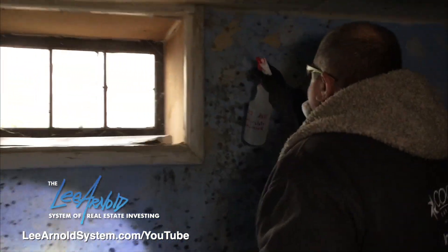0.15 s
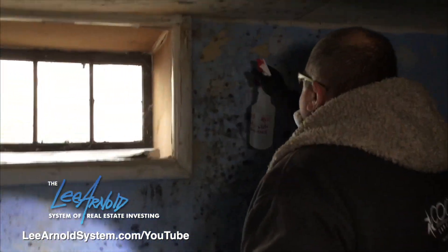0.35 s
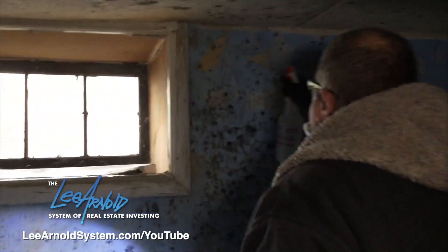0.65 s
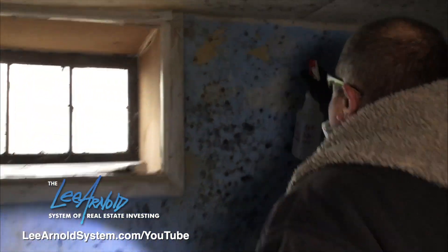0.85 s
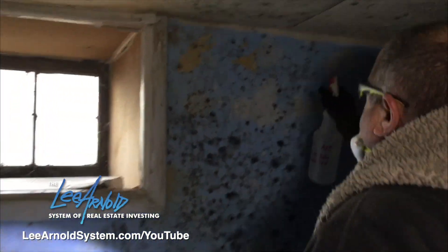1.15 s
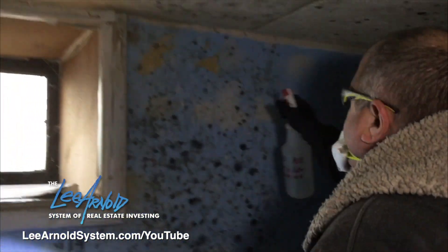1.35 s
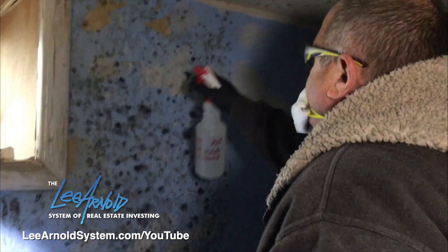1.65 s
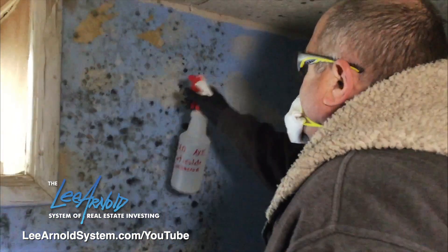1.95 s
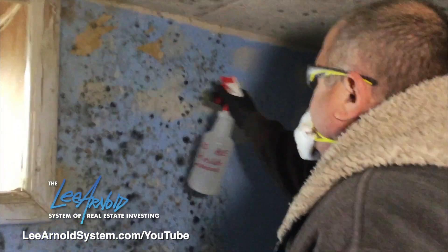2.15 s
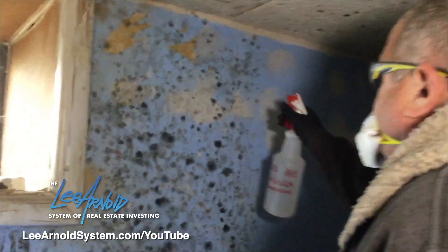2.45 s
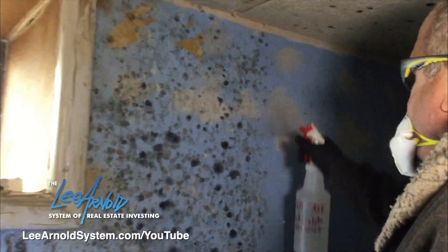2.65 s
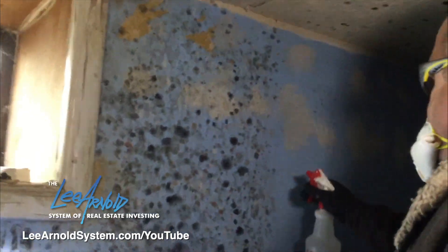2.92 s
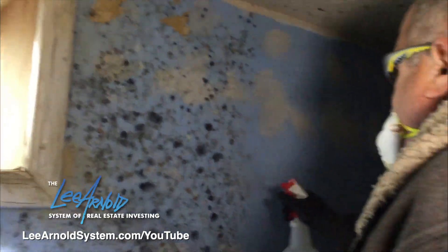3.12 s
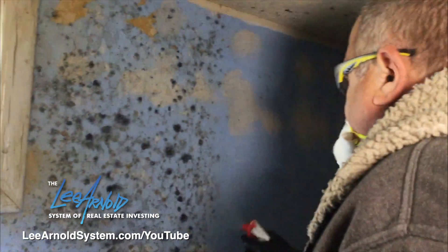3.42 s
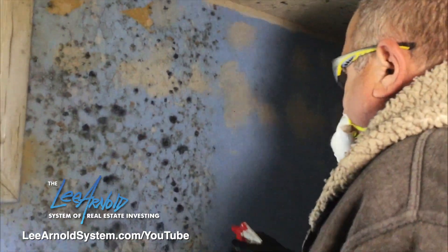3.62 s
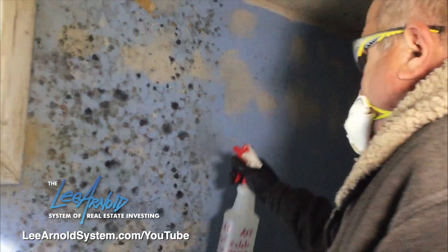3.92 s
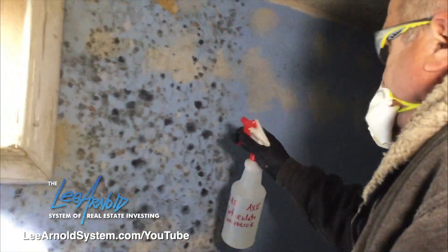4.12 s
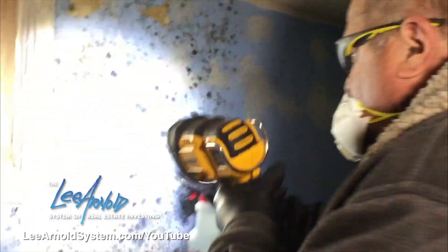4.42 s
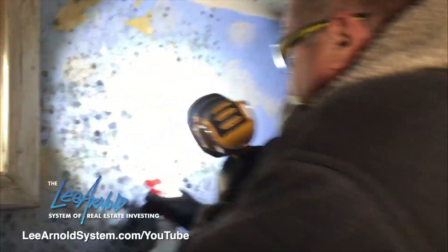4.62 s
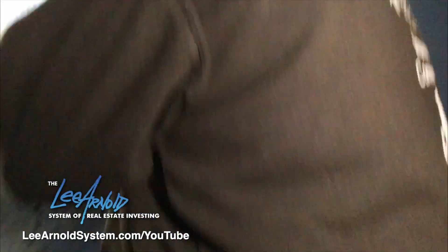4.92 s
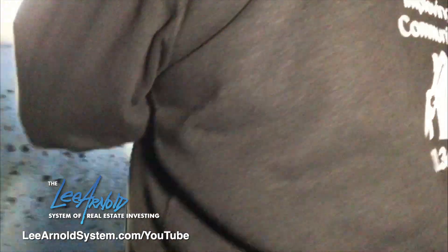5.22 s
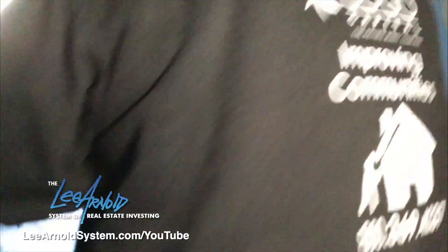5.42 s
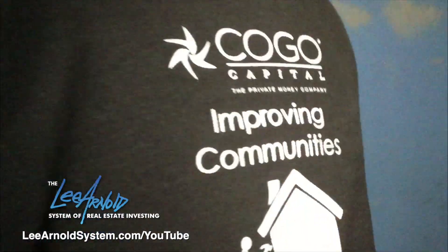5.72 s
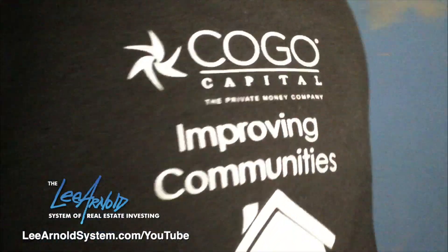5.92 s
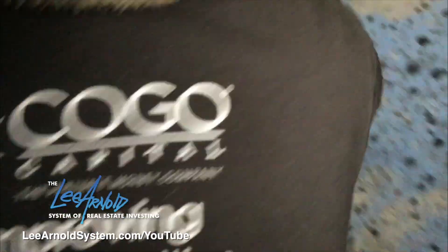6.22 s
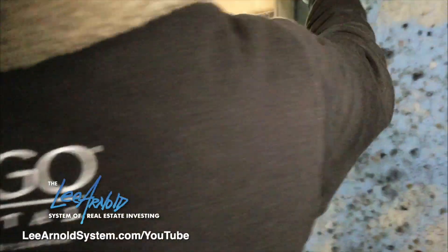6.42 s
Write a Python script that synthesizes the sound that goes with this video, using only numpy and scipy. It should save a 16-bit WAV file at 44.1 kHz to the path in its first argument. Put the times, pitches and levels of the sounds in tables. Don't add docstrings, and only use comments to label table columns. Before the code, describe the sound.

A trigger spray bottle pumps sixteen short, bright hisses in a steady rhythm, with handling knocks, jacket rustle and low rumble close by.

```python
import sys
import numpy as np
from scipy import signal
from scipy.fft import rfft, irfft
from scipy.io import wavfile
from scipy.ndimage import uniform_filter1d

SR = 44100
rng = np.random.default_rng(int(sys.argv[2]) if len(sys.argv) > 2 else 0)


def wrap_up_sound(samples):
    columns = np.atleast_2d(samples).T
    tamed = np.clip(columns, -1, 1)
    steps = np.round(tamed * 32767).astype(np.int16)
    wavfile.write(sys.argv[1], SR, steps)


def invert_db(level):
    return 10 ** (np.asarray(level, dtype=float) / 20)


N = 289296

# (time [s], movement [dB], drag [dB])
HANDLING = [(0, 5, 14.5), (.13, -1.5, 5), (.3, 2.5, 14), (.47, -5.5, -15.5), (.78, 4.5, -13.5),
            (1, 8.5, 10.5), (1.4, -1, -10), (1.8, 0.5, 2.5), (2.2, -5, -7), (2.5, 1, 3.5), (3.051, -0.5, 2),
            (3.3, -1, -9.5), (3.85, -1.5, -4.5), (4.05, -1, 2.5), (4.85, 1.5, 8.5), (5.5, 0.5, 8.5),
            (5.8, -13, -12.5), (6.1, -2.5, -1.5)]
# (frequency [Hz], density [dB per Hz])
RUMBLE_COLOUR = [(15, -45.5), (30, -26.5), (60, -11), (100, -1.5), (160, -4), (260, -6.5), (400, -10.5),
                 (650, -29), (1200, -34), (2500, -52), (5000, -80)]
# (time [s], level [dB])
MOTOR_LEVEL = [(0, -94), (.9, -76.5), (1.2, -69), (1.9, -78), (2.5, -70), (2.8, -86.5), (6.6, -88.5)]
# (middle [s], peak [dB], pitch [Hz], length [s])
BODY_KNOCKS = [(0.42, -41, 756, 0.00134), (0.427, -31.5, 725, 0.00141), (0.4261, -43, 451.6, 0.001105),
               (.4275, -43, 1069, 0.00165), (0.41, -56, 694, 0.0022), (0.439, -56, 705, 0.0021),
               (0.453, -59, 605.5, 0.006), (0.47, -64, 736, 0.0042), (.497, -55, 137, .006),
               (.52, -58, 113.4, 0.006), (1.672, -67, 200, 0.00245), (1.683, -63.5, 524, 0.00335),
               (1.709, -62, 545, 0.0045), (1.726, -64.5, 554, .004), (4.721, -60, 120, 0.0061),
               (4.791, -62.5, 99.6, 0.0065), (4.89, -57.5, 132, 0.005), (5.55, -46, 500, 0.0018),
               (5.557, -28.5, 615.3, 0.001574), (5.56, -39.5, 218.7, 0.00223), (5.563, -55, 111, 0.0083),
               (5.567, -42, 450, 0.00078), (5.938, -48, 638, 0.0019), (5.984, -49, 343, 0.00458),
               (5.994, -40.5, 203, 0.004), (6.003, -51, 111.4, 0.0077), (6.07, -55, 219, 0.00276),
               (6.116, -56.5, 272, 0.0029), (6.341, -57, 605, 0.003), (6.456, -51.5, 396, 0.00058)]
# (time [s], peak [dB], centre [Hz], width [Hz], decay [s])
CASING_SNAPS = [(0.418, -44.5, 9000, 14000, 0.0049), (0.4229, -36, 11000, 16000, 0.00158),
                (0.426, -40.5, 2450, 1500, 0.0026), (.453, -48.5, 13350, 1800, .007),
                (.457, -61, 7500, 2500, .005), (.502, -53.5, 3700, 2000, 0.0015),
                (.511, -59, 3800, 2000, 0.00107), (0.5228, -51, 3100, 3000, 0.00129),
                (.541, -53, 3400, 1800, .001), (4.065, -59.5, 13000, 5000, .012),
                (6.546, -61.5, 4800, 1500, .003), (6.546, -64, 15000, 2000, .003)]
# (start [s], loudest at [s], end [s], level [dB])
SLEEVE_SLIDES = [(0, .09, .14, -54), (.02, .08, .13, -56.5), (.85, .89, 1.08, -60.5),
                 (1.65, 1.76, 1.8, -74), (4.55, 4.6, 4.68, -65), (4.78, 4.86, 5.06, -67),
                 (6.05, 6.08, 6.2, -68), (5.99, 6.003, 6.13, -54), (2.4, 2.48, 2.68, -82),
                 (2.76, 2.88, 3.06, -82), (.7, .9, 1.05, -63), (5.58, 5.7, 5.725, -64)]
# (first pitch [Hz], last pitch [Hz], width [Hz])
SLEEVE_HOLLOWS = [(595, 620, 130), (13600, 13450, 3000), (1850, 4300, 950), (600, 1600, 900),
                  (950, 1600, 1000), (1550, 1100, 1300), (1000, 950, 900), (220, 245, 180),
                  (1800, 1810, 1100), (1800, 1810, 1100), (8500, 8510, 1200), (1300, 1100, 2000)]
# (start [s], length [s], stillest level [dB], rise next to a pull [dB], dull part [dB])
CLOTH_MOVES = [(0, 0.1135, -63.5, 2.5, -6), (0.113, 0.076, -70.5, 1, -8.5), (0.373, 0.048, -70.5, 10.5, -5),
               (0.423, 0.046, -67.5, 5.5, -3), (0.468, 0.11, -67.5, -4, -6.5),
               (0.736, 0.293, -56, -3, -10.5), (1.203, 0.137, -89, 11, -6),
               (1.583, 0.192, -100, 23.5, -5.5), (2.04, 0.193, -100, 21, -2.5),
               (2.477, 0.132, -96.5, 26, -7.5), (2.858, 0.13, -101, 21.5, -5),
               (3.258, .12, -100, 16.5, -8.5), (3.645, 0.16, -100, 18, -7.5), (4.077, 0.128, -87, 16, -8),
               (4.478, 0.083, -80.5, 10, -11), (4.854, 0.193, -68, 7.5, -7), (5.273, 0.1608, -76.5, 9, -3),
               (5.69, .165, -78.5, 4.5, -10.5), (6.1, 0.1394, -80, 6.5, -6),
               (6.501, 0.062, -76.5, -2.5, 2.5)]
# (frequency [Hz], density [dB per Hz])
CLOTH_COLOUR = [(530, -34.5), (900, -7.5), (1830, -6.5), (2090, -12), (3680, -15), (6640, -11.5),
                (8250, -7.5), (10000, -9.5), (13500, -6), (16000, -16)]
# (time [s], peak [dB])
VALVE_TICKS = [(1.2426, -67), (1.3096, -63.5), (1.5584, -54), (1.7206, -63.5), (2.1802, -64),
               (2.4784, -60.5), (2.585, -60.5), (2.9517, -62.5), (3.3523, -64.5), (3.7608, -67),
               (4.1781, -59), (4.56, -63), (4.5896, -50.5), (5.8052, -60), (6.2088, -61), (6.548, -66.5)]
# (jet forms [s], squeeze length [s], jet level [dB], swell during the squeeze [dB],
# splash on the wall re jet [dB])
TRIGGER_PULLS = [(0.196, 0.1002, -42, 1.5, -1.5), (.578, 0.1136, -42, 0.5, -5.5),
                 (0.988, 0.0954, -43.5, 2.5, 1.5), (1.363, 0.10555, -42.5, 2.5, -1),
                 (1.783, 0.1297, -41.5, 1.5, -0.5), (2.248, 0.1085, -41.5, 1.5, 0),
                 (2.642, 0.0862, -40.5, 1.5, -1.5), (3.006, 0.1202, -41, 0.5, -1),
                 (3.409, 0.10976, -41, 2, -1.5), (3.84, 0.1204, -41, 1, 0), (4.241, 0.1255, -39.5, -0.5, 0),
                 (4.644, 0.1305, -40.5, 1.5, 0), (5.056, 0.1356, -42, 2, -2), (5.459, 0.1376, -41, -1, -3),
                 (5.867, 0.1391, -42, -0.5, 1.5), (6.268, 0.1066, -41, 3.5, -1.5)]
# (aim at the microphone, heard in the finest hiss [dB],
# slowness of the pressure build [1 = usual])
HAND_AIM = [(-0.21, 0.78), (.2, 1.3), (-0.28, 0.96), (1, 1.05), (0.73, 1.15), (-1.5, .95), (-.3, .95),
            (0.46, .85), (-.2, .95), (1.78, 1.3), (0.78, 1.05), (1.16, 1.05), (-0.099, 1.05), (0.93, .9),
            (-1.25, 1.2), (-2.1, 1.05)]
# (resonance [Hz], its level [dB], lower shoulder [dB])
SWIRL_CHAMBER = [(4730, 3, -2.5), (4450, 2, 3), (4340, 4, -1.7), (4550, 4.5, -1.84), (4840, 1.5, -0.3),
                 (4800, 4, -2.5), (4670, 1.5, -0.12), (4630, 2, -1.48), (4450, 1, 0.5), (4790, 4.5, -0.5),
                 (4800, 2.5, -3), (5160, 1.5, -1.47), (4820, 0.5, 1.5), (4670, 2, 1.66), (4310, 0, -4.5),
                 (4580, 1.5, -6)]
# (frequency [Hz], density [dB per Hz])
JET_COLOUR = [(180, -55), (300, -25.5), (667, -17), (915, -17), (1430, -8.5), (1780, -9.5), (3580, -3.5),
              (4670, -1.5), (7440, -4.5), (8500, -2.5), (10200, -5.5), (15000, -5.5), (16000, -17.5)]
# (frequency [Hz], width [Hz], level [dB])
NOZZLE_PEAKS = [(8700, 300, 2), (6110, 220, -3), (1800, 540, 1), (11300, 170, 1.5)]
# (time from the jet forming [s], level re jet [dB], fineness of the mist [dB])
PRESSURE_BUILD = [
    (-.036, -48, 10),
    (0, -7, -8),
    (0.023, -1.5, -6.5),
    (.05, 1.5, -2),
]
# (time from letting go [s], level re jet [dB], fineness of the mist [dB])
PRESSURE_SAG = [
    (0, 0, -2.5),
    (0.029, -6.5, -6),
    (0.064, -19.5, -4.5),
    (.1, -31.5, -7),
    (.15, -61, 8.5),
]


def evened(x):
    return x / np.sqrt(np.mean(x ** 2) + 1e-20)


def read(points, hz):
    f, value = np.transpose(points)
    return np.interp(np.log(hz + 1), np.log(f + 1), value)


def add(mix, s, sound):
    part = mix[max(round(s * SR), 0):][:len(sound)]
    part += sound[:len(part)]


def resonate(x, hz, width):
    return signal.lfilter(*signal.iirpeak(hz, hz / width, SR), x)


def in_cellar(x):
    at = np.arange(90, 9000, 22) + rng.integers(0, 22, 405)
    echoes = np.zeros(9100)
    echoes[at] = rng.choice([-1., 1.], len(at)) * invert_db(-60 * at / SR / 0.078)
    echoes *= invert_db(-8.5) / np.linalg.norm(echoes)
    return signal.oaconvolve(x, echoes + signal.unit_impulse(len(echoes)))


def hiss(rows, colour_db, dull_hz, fine_hz, patchy_db, flicker_db):
    s, level_db, *ends_db = np.transpose(rows)
    length = int((s[-1] - s[0]) * SR)
    frames, hz = length // 64 + 5, np.fft.rfftfreq(256, 1 / SR)
    t = s[0] + np.arange(frames) * 64 / SR
    a, b, patches = rng.standard_normal((frames, 129, 3)).T
    patches = uniform_filter1d(patches, size=2, axis=0)
    patches = evened(uniform_filter1d(patches, size=40, axis=1))
    flicker = evened(uniform_filter1d(rng.standard_normal(frames), size=3))
    field_db = colour_db(hz)[:, None] + patchy_db * patches + flicker_db * flicker
    base = np.sqrt(np.mean(invert_db(2 * colour_db(hz))))
    dull_share = 1 / (1 + (hz / dull_hz) ** 6)
    fine_share = 1 / (1 + (fine_hz / (hz + 1)) ** 6)
    for share, end_db in zip((dull_share, fine_share), ends_db):
        field_db = field_db + np.outer(share, np.interp(t, s, end_db))
    spectrum = (a + 1j * b) * invert_db(field_db) / base
    x = signal.istft(spectrum, nperseg=256, noverlap=192)[1][:length]
    curve_db = np.interp(s[0] + np.arange(len(x)) / SR, s, level_db)
    envelope = invert_db(uniform_filter1d(curve_db, size=300))
    return s[0], x / 14 * envelope * signal.windows.tukey(len(x), .1)


def rumble():
    t, noise = np.arange(N) / SR, rng.standard_normal((4, N))
    low_gain = invert_db(read(RUMBLE_COLOUR, np.fft.rfftfreq(N, 1 / SR)))
    low = evened(irfft(rfft(noise[0]) * low_gain, N))
    lumps = evened(uniform_filter1d(uniform_filter1d(noise[1], size=500), size=500))
    scrape = evened(resonate(resonate(noise[2], 600, 260), 610, 300))
    motor = evened(resonate(resonate(noise[3], 154, 24), 153, 26))
    s, moved_db, drag_db = np.transpose(HANDLING)
    casing = invert_db(-73.5 + np.interp(t, s, moved_db)) * low
    casing += invert_db(-82.5 + np.interp(t, s, drag_db)) * scrape
    lumpy = casing * invert_db(3.03 * np.minimum(lumps, 2.1) - 1.0)
    return lumpy + invert_db(np.interp(t, *np.transpose(MOTOR_LEVEL))) * motor


def knocks():
    out = np.zeros(N)
    for s, db, hz, length in BODY_KNOCKS:
        t = np.arange(-3 * length, 4 * length, 1 / SR)
        spread = np.where(t < 0, 0.712 * length, 1.8 * length)
        swell = np.exp(-.5 * (t / spread) ** 2)
        add(out, s - 3 * length, invert_db(db) * swell * np.cos(2 * np.pi * hz * t))
    return out


def snaps():
    out, t = np.zeros(N), np.arange(1500) / SR
    for (s, db, hz, width, decay), noise in zip(CASING_SNAPS, rng.standard_normal((len(CASING_SNAPS), 1500))):
        snap = resonate(resonate(noise * np.exp(-t / decay), hz, width), hz, width)
        add(out, s, invert_db(db) * snap / abs(snap).max())
    return out


def slides():
    out, ends_db = np.zeros(N), -15
    for (start, loudest, end, db), (first_hz, last_hz, width_hz) in zip(SLEEVE_SLIDES, SLEEVE_HOLLOWS):
        t = np.arange(start, end, 1 / SR)
        lowpass = signal.butter(2, width_hz / 2, fs=SR)
        a, b = signal.lfilter(*lowpass, rng.standard_normal((len(t), 2)), axis=0).T
        turn = 2 * np.pi * np.cumsum(np.linspace(first_hz, last_hz, len(t))) / SR
        hollow = evened(a * np.cos(turn) + b * np.sin(turn))
        swell = invert_db(db + np.interp(t, [start, loudest, end], [ends_db, 0, ends_db]))
        add(out, start, swell * hollow * signal.windows.tukey(len(t), .1))
    return out


def rustle():
    out = np.zeros(N)
    stillest_at, regrip = 0.582, 0.73
    for s, length, db, rise_db, dull_db in CLOTH_MOVES:
        rows = [(s, db + rise_db, dull_db),
                (s + stillest_at * length, db, dull_db),
                (s + length, db + regrip * rise_db, dull_db)]
        rows = np.add(rows, [0, .6, 7.1])
        add(out, *hiss(rows, lambda hz: read(CLOTH_COLOUR, hz), 4100, 9000, patchy_db=3.5, flicker_db=1.5))
    return out


def ticks():
    out, t = np.zeros(N), np.arange(2000) / SR
    click_db, leak_db = -15.5, 0.05
    for (s, db), noise in zip(VALVE_TICKS, rng.standard_normal((len(VALVE_TICKS), 2000))):
        click = resonate(noise * np.exp(-t / 0.00037), 3500, 3000)
        puff = noise * (1.3 * np.exp(-t / 0.00049) + 0.39 * np.exp(-t / 0.026))
        leak = resonate(puff, 17000, 6000) + 0.39 * resonate(puff, 8500, 1500)
        add(out, s, invert_db(db) * (invert_db(click_db) * click + invert_db(leak_db) * leak))
    return out


def stroke(s, length, db, swell_db, splash_db, slowness):
    build, sag = np.transpose(PRESSURE_BUILD), np.transpose(PRESSURE_SAG)
    times = s + np.r_[slowness * build[0], length + sag[0]]
    level_db = db + np.r_[build[1], swell_db + sag[1]]
    spit_db = np.minimum(-np.r_[1.227 * build[1], 0.384 * sag[1]], 28.5)
    return np.c_[times, level_db, -13.5 + splash_db + spit_db, np.r_[build[2], sag[2]]]


def jet_colour(hz, swirl_hz, swirl_db, shoulder_db):
    moving = [(swirl_hz, 380, swirl_db), (0.63 * swirl_hz, 450, shoulder_db)]
    peaks_db = sum(db / (1 + ((hz - f) / w) ** 2) for f, w, db in NOZZLE_PEAKS + moving)
    return read(JET_COLOUR, hz) + peaks_db


def spray():
    out = np.zeros(N)
    for pull, swirl, (aim_db, slowness) in zip(TRIGGER_PULLS, SWIRL_CHAMBER, HAND_AIM):
        rows = stroke(*pull, slowness) + [0, 4.0, 12.5, 4.0 + aim_db]
        s, mist = hiss(rows, lambda hz: jet_colour(hz, *swirl), 2900, 9600, patchy_db=2, flicker_db=0.69)
        add(out, s, in_cellar(mist))
    return out


def scene():
    handling = rumble() + knocks() + snaps() + slides()
    bottle = in_cellar(ticks())[:N] + spray()
    mono = handling + rustle() + bottle
    return np.array([mono, mono])


def roll_off(x):
    return signal.sosfilt(signal.butter(12, 16480, fs=SR, output="sos"), x)


def record(dry):
    noisy = dry + invert_db(-94) * rng.standard_normal(N)
    thinned = signal.lfilter(*signal.butter(2, 45, "high", fs=SR), noisy)
    band_edge = signal.firwin(511, 15780, window=("kaiser", 9), fs=SR)
    limited = signal.oaconvolve(thinned, band_edge[None], "same")
    return roll_off(limited)


dry = scene()
out = record(dry)
wrap_up_sound(out)
```